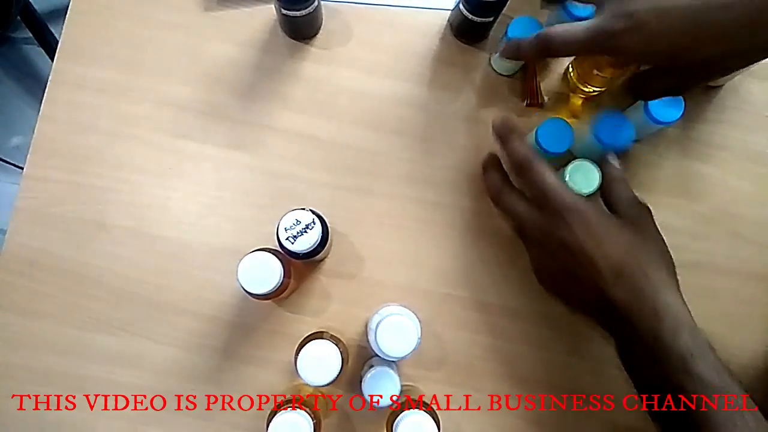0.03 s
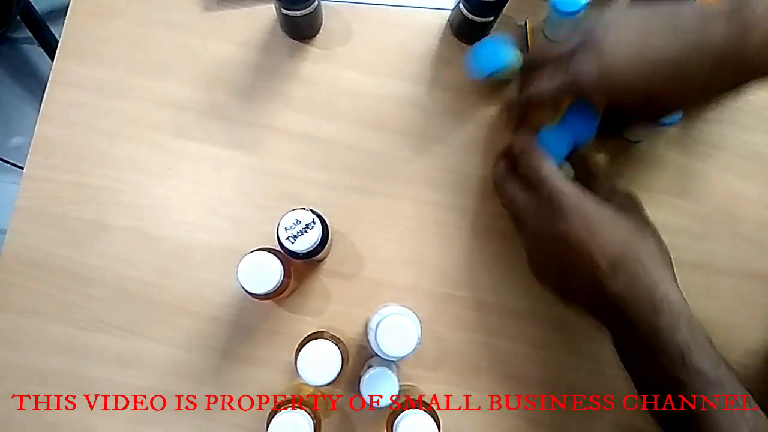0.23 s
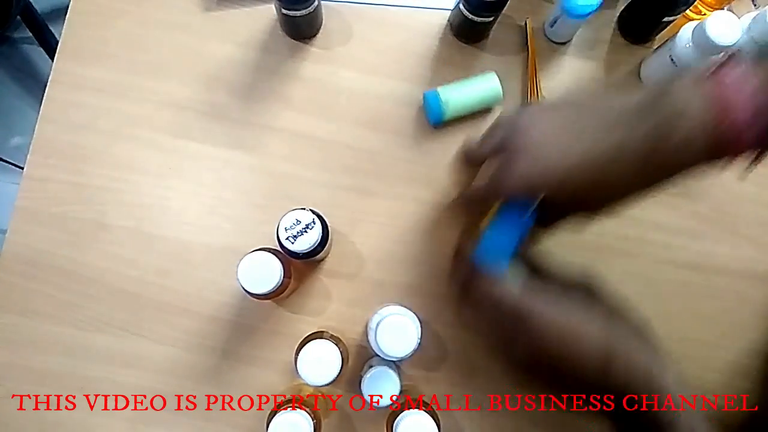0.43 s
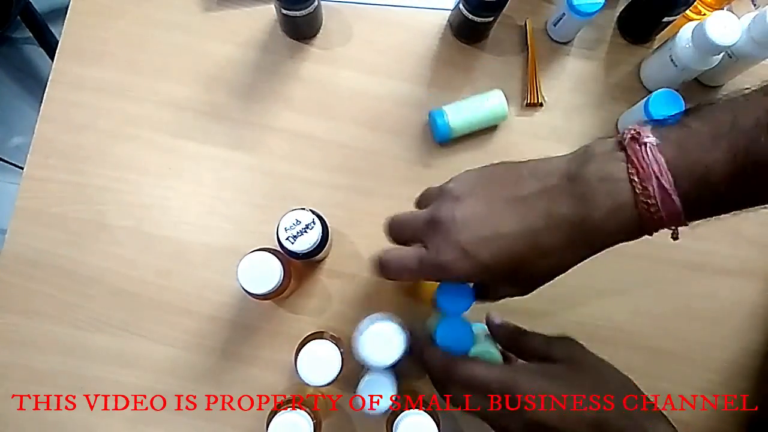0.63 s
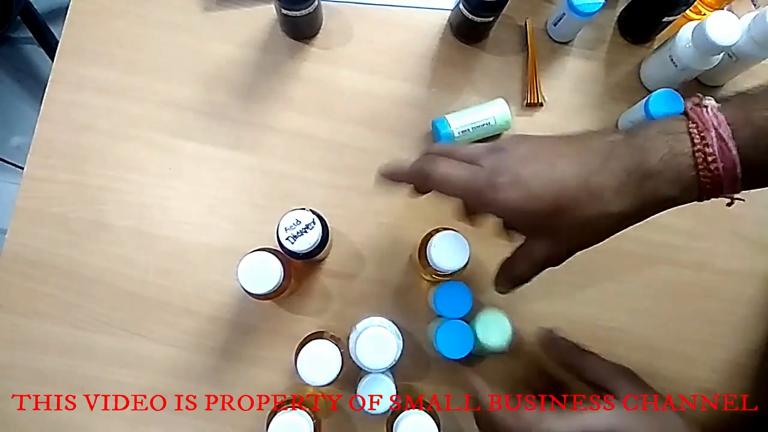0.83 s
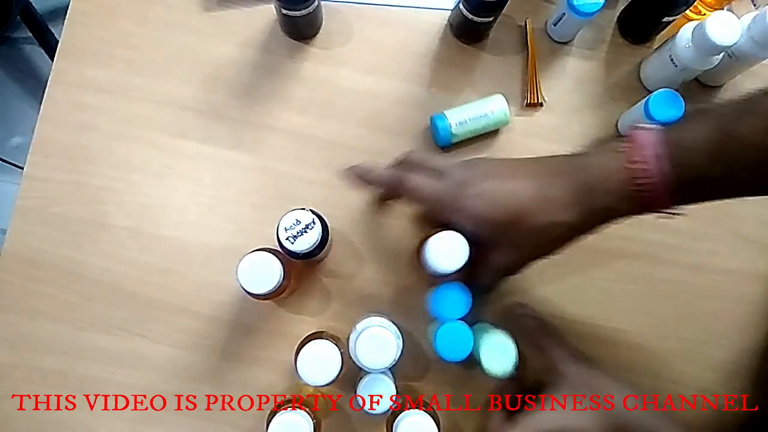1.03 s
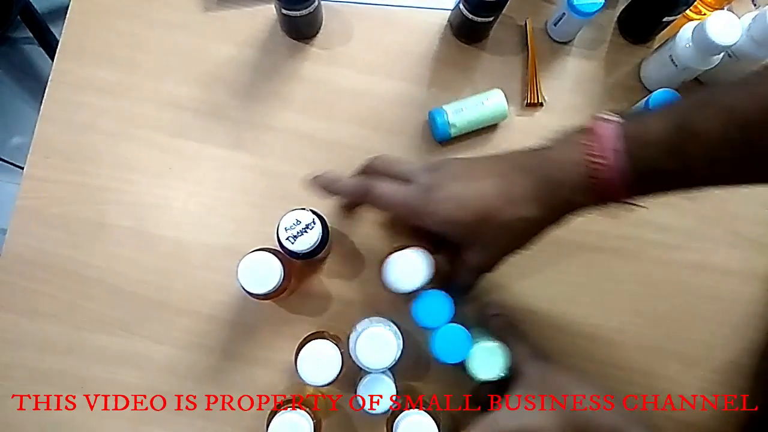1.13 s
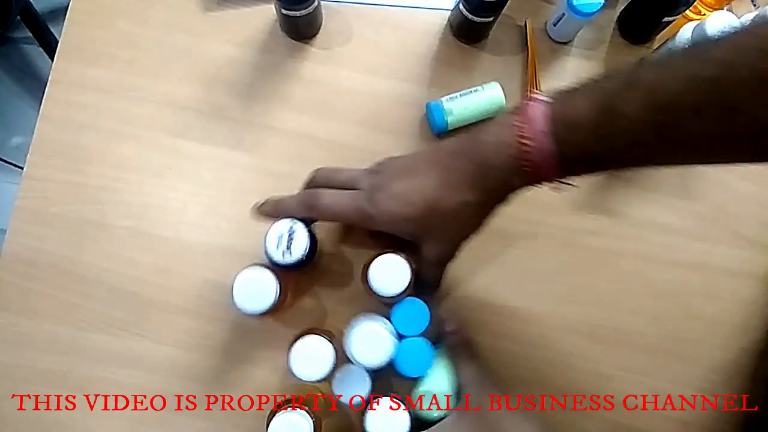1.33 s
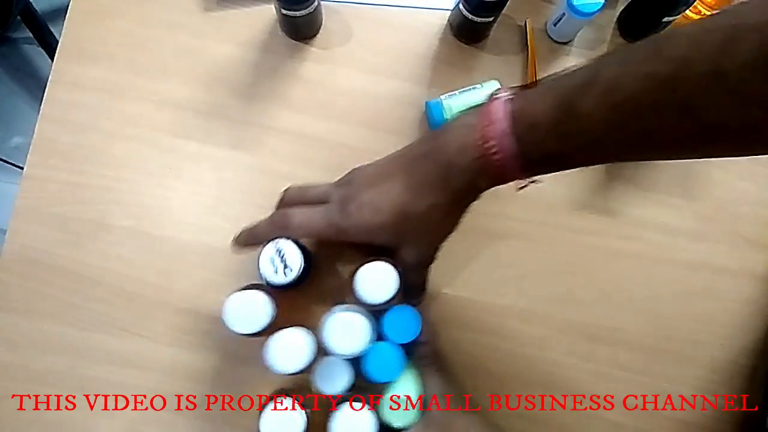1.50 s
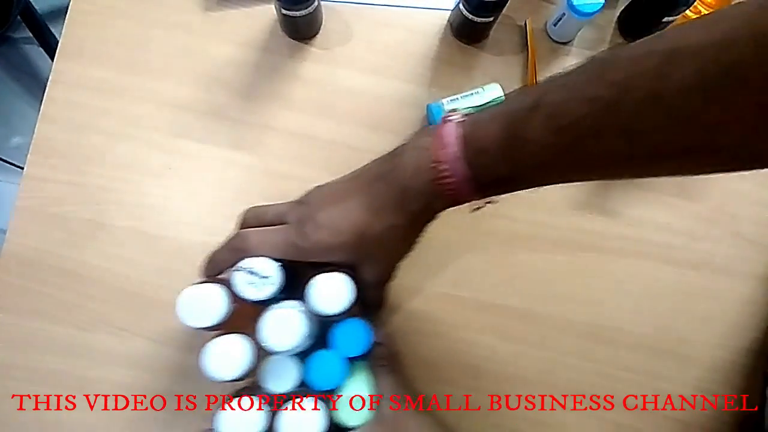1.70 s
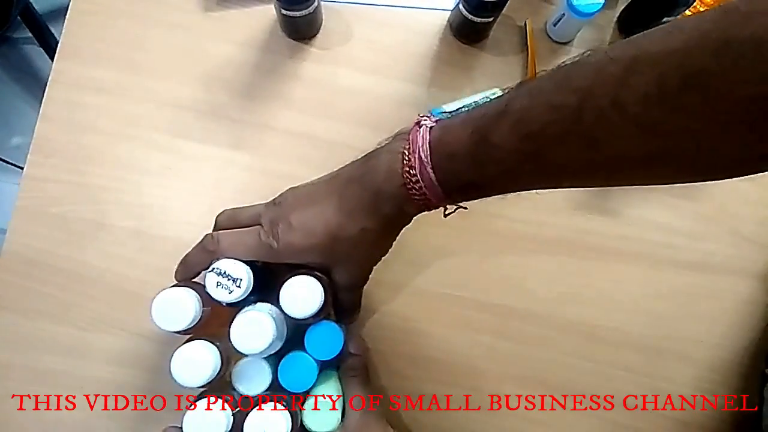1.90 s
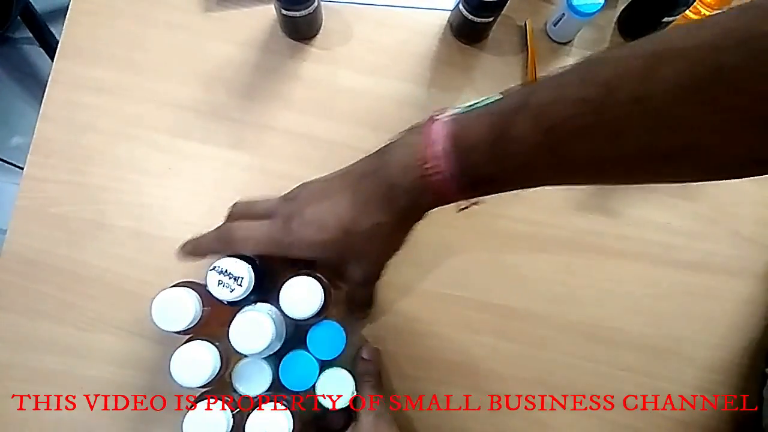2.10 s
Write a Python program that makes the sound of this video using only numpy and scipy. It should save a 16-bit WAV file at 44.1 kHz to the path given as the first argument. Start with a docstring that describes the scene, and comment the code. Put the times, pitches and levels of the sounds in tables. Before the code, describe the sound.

Small bottles sliding and scraping across a wooden table, with a few knocks and clinks.

```python
"""Bottles pushed over a wooden table

A few light bottles slide first, then the whole heavy cluster. Stick-slip friction at their bases drives
the modes of the tabletop, which judders and drones, while the wood grain rasps and hisses under them.
Bottles bump the table, knock together, clink and sing at their own pitches. A small room reverberates
over a low murmur of air."""
import sys
import numpy as np
from scipy import signal
from scipy.fft import rfft, irfft
from scipy.io import wavfile
from scipy.ndimage import uniform_filter1d

SR = 44100
rng = np.random.default_rng(int(sys.argv[2]) if len(sys.argv) > 2 else 0)


def master_out(mix):
    """Clip the mix to full scale and print it as 16-bit PCM to the path in sys.argv[1]."""
    frames = np.transpose(np.atleast_2d(mix))
    ceiling = np.clip(frames, -1, 1)
    pcm = np.round(ceiling * 32767).astype(np.int16)
    wavfile.write(sys.argv[1], SR, pcm)


N = 94815

# Modes of the tabletop. Each row: frequency in Hz, level in dB, time to fall 60 dB in seconds.
TABLETOP_MODES = [(51, -13.5, 0.3), (114.6, -15.5, 0.86), (157.8, 1.5, 0.29), (235.5, 7.5, 0.069),
                  (282.4, -0.5, 0.093), (342.7, 1.5, 0.13), (406.3, -1.5, 0.14), (447.7, -3, 0.14),
                  (510.1, -2, 0.31), (627.3, 0.5, .17), (750, -2.5, 0.38)]
# Spectrum of the friction hiss. Each row: frequency in Hz, level in dB.
HISS_SPECTRUM = [(1500, -37), (3700, -2), (5700, -2.5), (7500, 2.5), (12000, 3), (14500, -2), (16000, -7)]
GRAINS_PER_S, GRAIN_SPREAD_DB = 6000, 4  # catches of the bases on the wood grain
RASP_WIDTH, HISS_WIDTH = 2.64, 11  # how unlike a bottle's ring is on the left and right


def amp(db):
    """Amplitude ratio of a level in decibels."""
    return 10 ** (np.asarray(db) / 20)


def unit_rms(x):
    """Normalisation to an rms of 1."""
    return x / np.sqrt(np.mean(x ** 2) + 1e-20)


def wander(seconds):
    """A moving average of white noise drifts at random, with an rms of 1."""
    return unit_rms(uniform_filter1d(rng.standard_normal(N), max(1, round(seconds * SR))))


def envelopes(rows):
    """One smoothed amplitude envelope per level column, silent outside the listed times."""
    times, *columns = np.transpose(rows)
    t = np.arange(N) / SR
    return [uniform_filter1d(amp(np.interp(t, times, db, left=-np.inf, right=-np.inf)), 600)
            for db in columns]


def add(mix, start_s, sound):
    """Superposition: a sound joins the mix at its start time."""
    part = mix[..., round(start_s * SR):][..., :sound.shape[-1]]
    part += sound[..., :part.shape[-1]]


def convolve(x, response):
    """A linear system's output is its input convolved with its impulse response."""
    return signal.fftconvolve(np.atleast_2d(x), np.atleast_2d(response), axes=1)[:, :N]


def colour(x, spectrum):
    """Minimum-phase filter: the phase follows from the log gain by the Hilbert transform."""
    hz, db = np.transpose(spectrum)
    bin_hz = abs(np.fft.fftfreq(4096, 1 / SR))
    log_gain = np.log(amp(np.interp(np.log(bin_hz + 1), np.log(hz + 1), db)))
    response = np.fft.ifft(np.exp(np.conj(signal.hilbert(log_gain)))).real
    return convolve(x, response[:len(response) // 2])


def pan(x, layer):
    """A level difference between the channels places a layer to the left."""
    # Each entry: layer, lead of the left channel over the right in dB.
    left_db = {"drone": 6, "rasp": 3.5, "hiss": 3}
    return x * amp(np.array([[.5], [-.5]]) * left_db[layer])


def impulses(per_s, spread_db):
    """A Poisson process of tiny impacts, a few of them large."""
    size = amp(spread_db * np.minimum(rng.exponential(1, N), 4))
    return size * rng.choice([-1, 1], N) * (rng.random(N) < per_s / SR)


def tabletop(wood_db=-5.5, wood_t60=0.076):
    """Impulse response of a wooden plate: damped modes and a short burst of dense ringing."""
    t = np.arange(SR // 2) / SR
    modes = sum((-1) ** k * amp(db - 60 * t / t60) * np.sin(2 * np.pi * hz * t)
                for k, (hz, db, t60) in enumerate(TABLETOP_MODES))
    band = signal.butter(2, [60, 700], "band", fs=SR, output="sos")
    wood = signal.sosfilt(band, rng.standard_normal(len(t)))
    return unit_rms(modes) + amp(wood_db) * unit_rms(wood * amp(-60 * t / wood_t60))


def drone(table, spectrum):
    """Forced vibration: stick-slip jerks shake the tabletop, held to an even strength."""
    jerks = impulses(per_s=500, spread_db=3)
    vibration = colour(irfft(rfft(jerks) * rfft(table, N), N), spectrum)
    running_rms = np.sqrt(uniform_filter1d(vibration ** 2, 2000, axis=1) + 1e-12)
    return pan(vibration / running_rms, "drone")


def judder(table, envelope, hard_push_db=-28.5, waver_hz=3.63, waver_db=2.5, waver_s=.03):
    """Mode locking: stick-slip follows one tabletop mode, and the next too when pushed hard."""
    # Spectrum of the loose rumble under the tones. Each row: frequency in Hz, level in dB.
    rumble_spectrum = [(25, -11.5), (55, -3.5), (115, -12), (165, -0.5), (400, -30.5), (1000, -68)]
    tone_db, rumble_db = (-2, -3.5), -8
    effort = np.minimum(envelope / amp(hard_push_db), 1)
    tones = 0
    for (hz, _, _), db, share in zip(TABLETOP_MODES[1:3], tone_db, (1, effort)):
        cycles = np.cumsum(hz + waver_hz * wander(waver_s)) / SR
        tones += share * amp(db + waver_db * wander(waver_s)) * np.sin(2 * np.pi * cycles)
    return envelope * (pan(tones, "drone") + amp(rumble_db) * drone(table, rumble_spectrum))


def scrape(spectrum, width, layer, bottles=4, grip_db=3, chatter_db=3.5, decay_s=0.00077):
    """Roughness noise: each base catches on the wood grain in clumps, and its bottle rings briefly."""
    t = np.arange(SR // 100) / SR
    grips = np.array([amp(grip_db * wander(seconds=0.048)) for _ in range(bottles)])
    friction = 0
    for grip in grips / np.linalg.norm(grips, axis=0):  # the bottles take turns to bear down
        grains = impulses(GRAINS_PER_S / bottles, GRAIN_SPREAD_DB)
        chatter = amp(chatter_db * wander(seconds=0.0069))
        noise = rng.standard_normal(len(t)) + width * rng.standard_normal((2, len(t)))
        response = 0.85 * noise * np.exp(-t / decay_s)
        response[:, 0] = 1  # the direct pulse
        friction += convolve(grains * grip * chatter, response)
    return pan(unit_rms(colour(friction, spectrum)), layer)


def slide(table, levels, drone_spectrum, rasp_spectrum):
    """Sliding friction radiates by two paths, returned as (structure-borne, airborne)."""
    judder_gain, drone_gain, rasp_gain, hiss_gain = envelopes(levels)
    structure = judder(table, judder_gain) + drone_gain * drone(table, drone_spectrum)
    rasp = rasp_gain * scrape(rasp_spectrum, RASP_WIDTH, "rasp")
    hiss = hiss_gain * scrape(HISS_SPECTRUM, HISS_WIDTH, "hiss")
    return structure, rasp + hiss


def light_push(table):
    """Friction under a light load: a few bottles slide with a strong rasp."""
    # Course of the push. Each row: time in seconds, then judder, drone, rasp and hiss levels in dB.
    levels = [(0, -63, -62, -84, -82.5), (.09, -74, -56.5, -63, -60), (.19, -63, -47.5, -57.5, -61.5),
              (.21, -66, -42, -48, -50), (.27, -49, -35, -37.5, -44), (.32, -46.5, -37.5, -37, -50),
              (.345, -38.5, -29, -37, -43.5), (.4, -32.5, -25.5, -30.5, -45),
              (.43, -42, -35.5, -38.5, -55.5), (.53, -43, -44, -46, -58), (.62, -41, -43, -44, -51.5),
              (.73, -53.5, -48, -62, -63), (.8, -57.5, -58.5, -71, -99), (.96, -67, -73, -93, -102)]
    # Spectra of the drone and the rasp. Each row: frequency in Hz, level in dB.
    drone_spectrum = [(100, -40.5), (290, 5), (340, 7), (420, -1), (700, -8), (2500, -13.5)]
    rasp_spectrum = [(200, -29.5), (650, 5.5), (2200, -2), (2900, -7.5), (5500, -12), (16000, -54)]
    return slide(table, levels, drone_spectrum, rasp_spectrum)


def bumps(table, damping_s=0.022):
    """Force pulses excite the hand-damped tabletop; a longer contact sounds duller."""
    # Bottles bumping the table. Each row: start in seconds, level in dB, contact time in seconds.
    contacts = [(0.3679, -20.5, 0.0009), (1.247, -17.5, 0.0031), (1.534, -26, 0.0015), (1.647, -26, 0.0056)]
    force = np.zeros(N)
    for start, db, contact_s in contacts:
        pulse = np.hanning(max(3, round(contact_s * SR)))
        add(force, start, amp(db) * pulse / pulse.sum())
    damped = table * np.exp(-np.arange(len(table)) / SR / damping_s)
    return pan(convolve(force, damped / abs(damped).max()), "drone")


def impact(spectrum, decay_s, ringing):
    """An impact transient: a sharp pulse, then milliseconds of dense, hand-damped ringing."""
    t = np.arange(SR // 20) / SR
    burst = ringing * rng.standard_normal((2, len(t))) * np.exp(-t / decay_s)
    burst[:, 0] = -2
    sound = colour(burst, spectrum)
    return sound / np.sqrt((sound ** 2).sum(1, keepdims=True) / 10)


def knocks():
    """Collisions between bottles excite two broad bands: a hollow clack and a hard tick."""
    # Each row: start in seconds, clack level in dB, tick level in dB.
    collisions = [(0.3772, -6.5, -16), (0.5852, -40, -25), (0.5924, -45, -29), (.6048, -17, -40),
                  (.6095, -38, -21.5), (1.3493, -38, -25), (1.3598, -32, -24), (1.7062, -48, -18.5)]
    # Spectra of the clack and the tick. Each row: frequency in Hz, level in dB.
    clack_spectrum = [(150, -28.5), (600, 3.5), (1900, 1.5), (2900, -9), (5200, -6), (7500, -41)]
    tick_spectrum = [(1000, -27.5), (3500, -16), (6000, -8.5), (10300, -7.5), (12500, -3.5), (16000, -13)]
    out = np.zeros((2, N))
    for start, clack_db, tick_db in collisions:
        clack = impact(clack_spectrum, decay_s=0.0049, ringing=0.22)
        tick = impact(tick_spectrum, decay_s=0.0047, ringing=.5)
        add(out, start, amp(clack_db) * pan(clack, "rasp") + amp(tick_db) * pan(tick, "hiss"))
    return out


def clinks(group_size=3, detuning=.05, contact_s=0.00028):
    """Free vibration of glass in close groups of modes: a loose bottle rings longer than a held one."""
    # Glass meeting glass. Each row: start in seconds, level in dB, multiple of the held ring time.
    touches = [(0.3772, -22, 5), (0.3855, -21, 6), (1.9068, -36, 1), (1.924, -25, 1)]
    # Modes of a held bottle. Each row: frequency in Hz, level in dB, time to fall 60 dB in seconds.
    glass_modes = [(3150, -15, .0076), (7830, -8, .006), (8650, -6, .0048), (12200, -9, .006)]
    out, t = np.zeros((2, N)), np.arange(SR // 8) / SR
    groups = 1 + detuning * rng.uniform(-0.75, 1, (len(glass_modes), group_size, 1))
    attack = np.minimum(t / contact_s, 1)
    for start, db, ring_factor in touches:
        glass = 0
        for (hz, mode_db, t60), ratios in zip(glass_modes, groups):
            cycles = hz * ratios * t + rng.random((2, group_size, 1))
            glass += amp(mode_db - 60 * t / (t60 * ring_factor)) * np.sin(2 * np.pi * cycles).sum(1)
        add(out, start, amp(db) / np.sqrt(group_size) * pan(glass * attack, "hiss"))
    return out


def wall_mode(hz, decay_at_1khz_s=.012):
    """A bottle's wall is a damped oscillator whose decay rate grows as frequency squared."""
    t = np.arange(SR // 10) / SR
    return np.sin(2 * np.pi * hz * t) * np.exp(-t / decay_at_1khz_s * (hz / 1000) ** 2)


def singing_bottles():
    """Resonance: a bottle's pitch swells as its base chatters over the wood, or pings at a tap."""
    # Sliding bottles. Each row: start in seconds, length in seconds, level in dB, pitch in Hz.
    swells = [(.385, .085, -37.5, 2280), (1.06, .76, -52, 750), (1.505, .065, -47, 2400)]
    # Light taps. Each row: start in seconds, level in dB, pitch in Hz.
    taps = [(1.255, -37, 2520), (2.065, -60, 5700), (2.0825, -58, 5700)]
    out = np.zeros(N)
    for start, length, db, hz in swells:
        swell = np.hanning(round(length * SR)) ** .5
        ringing = convolve(impulses(GRAINS_PER_S, GRAIN_SPREAD_DB), wall_mode(hz))[0, :len(swell)]
        add(out, start, amp(db) * swell * unit_rms(ringing))
    for start, db, hz in taps:
        add(out, start, amp(db) * wall_mode(hz))
    return pan(out, "rasp")


def drags(table, hz=228.5):
    """Narrow-band stick-slip: as a push slows to rest, the bases groan on one tabletop mode."""
    # Each row: start in seconds, length in seconds, level in dB.
    groans = [(.62, 0.34, -53.5), (1.72, 0.49, -49)]
    envelope = np.zeros(N)
    for start, length, db in groans:
        add(envelope, start, amp(db) * np.hanning(round(length * SR)) ** .5)
    return envelope * drone(table, [(hz / 2, -50), (hz, 0), (hz * 2, -50)])


def heavy_push(table):
    """Friction under a heavy load: the whole cluster judders along with a deeper drone."""
    # Course of the push. Each row: time in seconds, then judder, drone, rasp and hiss levels in dB.
    levels = [(.97, -41.5, -62, -81, -85), (1.11, -50.5, -43, -62.5, -67.5), (1.145, -28, -44, -60.5, -67),
              (1.31, -26.5, -31.5, -57, -58.5), (1.36, -24.5, -31.5, -47.5, -50),
              (1.41, -31, -35, -52.5, -62), (1.475, -38, -32.5, -50.5, -49),
              (1.535, -30, -23, -50.5, -41.5), (1.575, -29, -29.5, -51.5, -52),
              (1.635, -34, -25.5, -47.5, -48.5), (1.715, -35, -29, -45.5, -45.5),
              (1.855, -40.5, -38.5, -55, -59.5), (2.015, -47.5, -60, -88, -82),
              (2.05, -60.5, -48.5, -74.5, -91), (2.15, -64, -65.5, -89.5, -97)]
    # Spectra of the drone and the rasp. Each row: frequency in Hz, level in dB.
    drone_spectrum = [(50, -31.5), (130, 0.5), (300, 2.5), (510, -5), (620, -13), (2000, -40.5)]
    rasp_spectrum = [(200, -15.5), (1300, -2.5), (1850, -6.5), (2400, -6), (3000, -11.5), (16000, -45)]
    return slide(table, levels, drone_spectrum, rasp_spectrum)


def murmur(db=-66):
    """Ambient noise: a low murmur of air, partly coherent between the channels."""
    # Each row: frequency in Hz, level in dB.
    spectrum = [(25, -5.5), (200, 11), (900, -32), (16000, -50)]
    noise = rng.standard_normal(N) + .5 * rng.standard_normal((2, N))
    return amp(db) * pan(unit_rms(colour(noise, spectrum)), "drone")


def room(x, t60=0.26, gap_s=0.0037, db=-0.5):
    """Diffuse reverberation: an exponentially decaying tail, independent in each channel."""
    t = np.arange(SR // 2) / SR
    tail = rng.standard_normal((2, len(t))) * amp(-60 * t / t60) * (t > gap_s)
    return amp(db) * convolve(x, tail / np.linalg.norm(tail[0]))


def scene():
    """Superposition of all sources; only the airborne friction, knocks and clinks reverberate."""
    table = tabletop()
    light_structure, light_air = light_push(table)
    heavy_structure, heavy_air = heavy_push(table)
    airborne = light_air + heavy_air + singing_bottles()
    hits, glass, ambience = knocks(), clinks(), murmur()
    structure = light_structure + heavy_structure + drags(table) + bumps(table)
    reverberation = room(airborne + 0.39 * hits + .27 * glass)
    return structure + airborne + hits + glass + reverberation + ambience


def record(dry):
    """Band limiting: a linear-phase low-pass filter removes the highest treble."""
    lowpass = signal.firwin(511, cutoff=16200, window=("kaiser", 9), fs=SR)
    return signal.oaconvolve(dry, lowpass[None], "same")


dry = scene()
out = record(dry)
master_out(out)
```